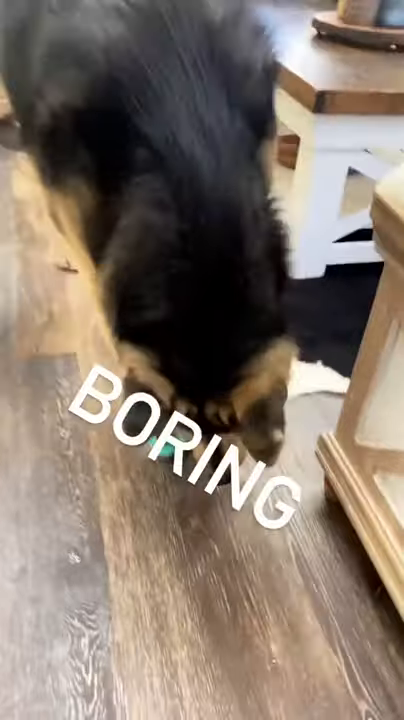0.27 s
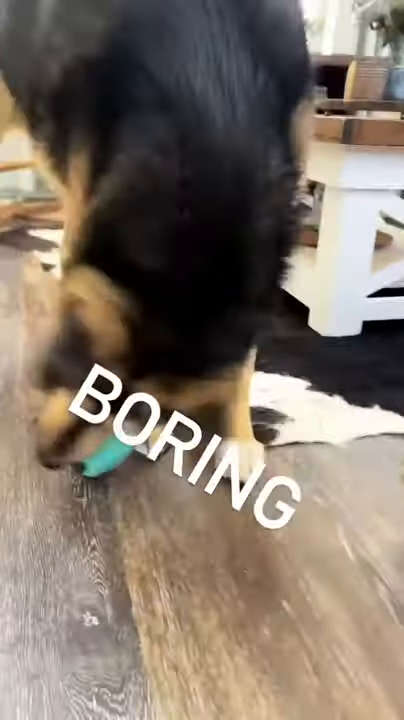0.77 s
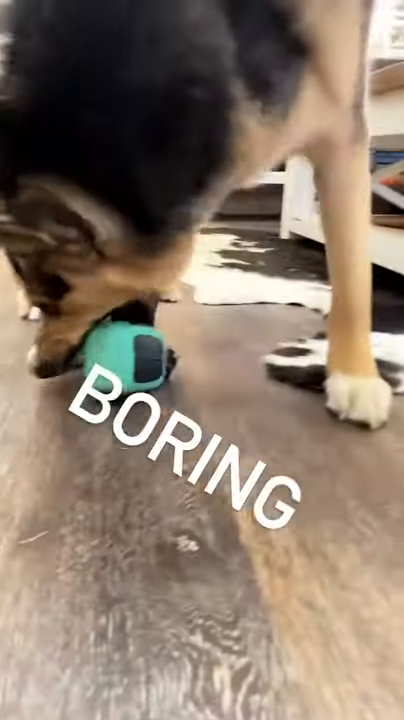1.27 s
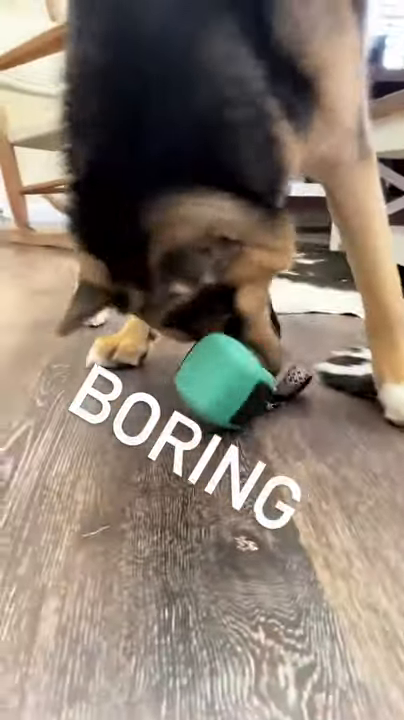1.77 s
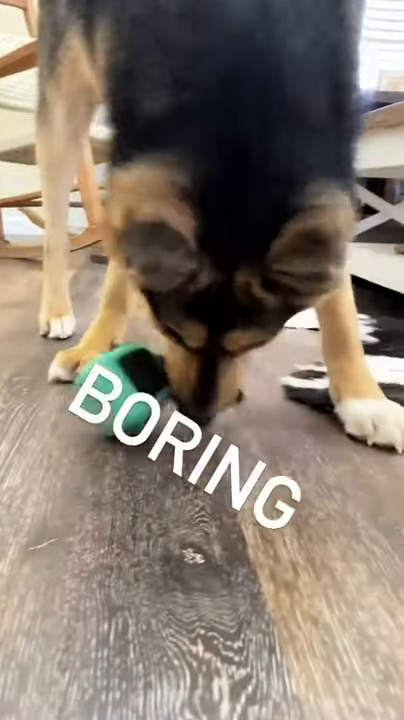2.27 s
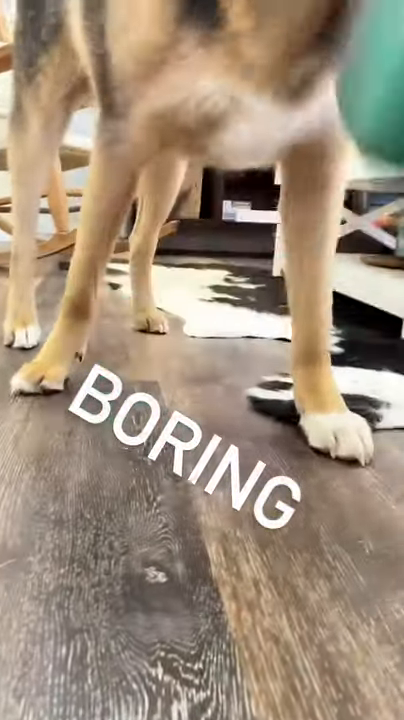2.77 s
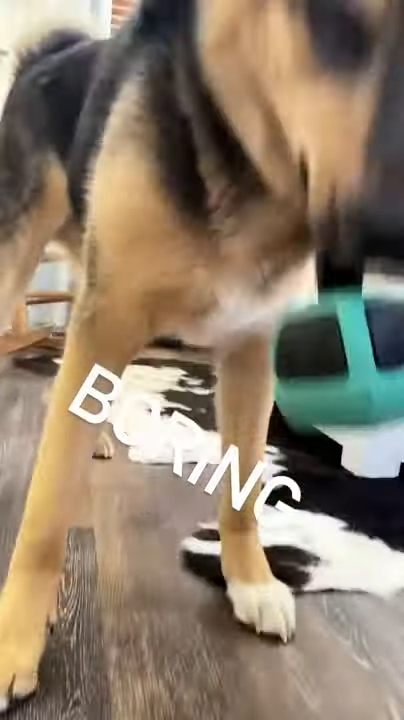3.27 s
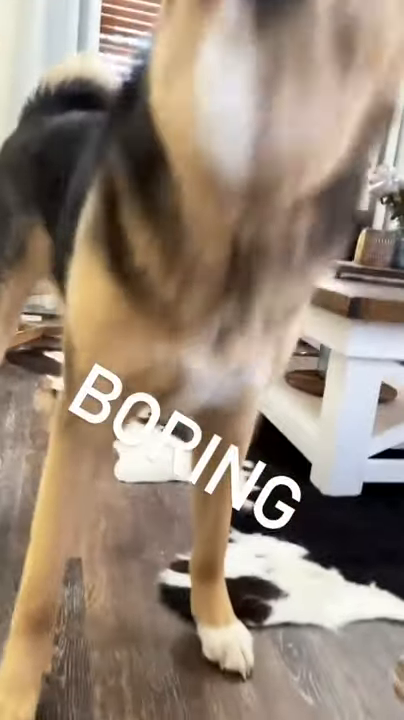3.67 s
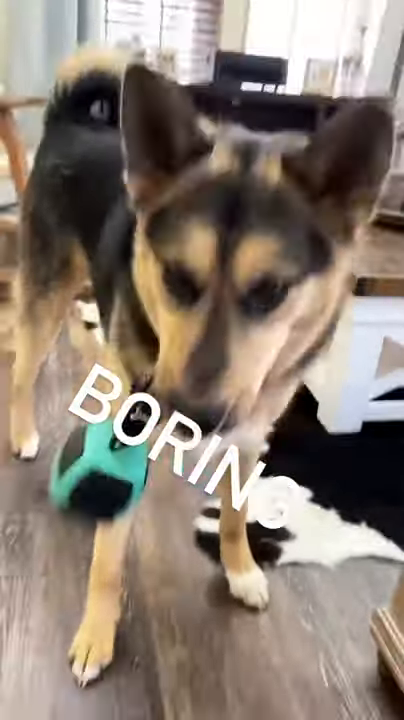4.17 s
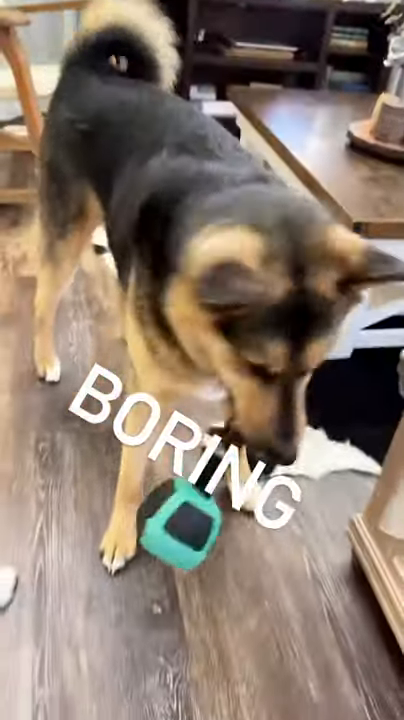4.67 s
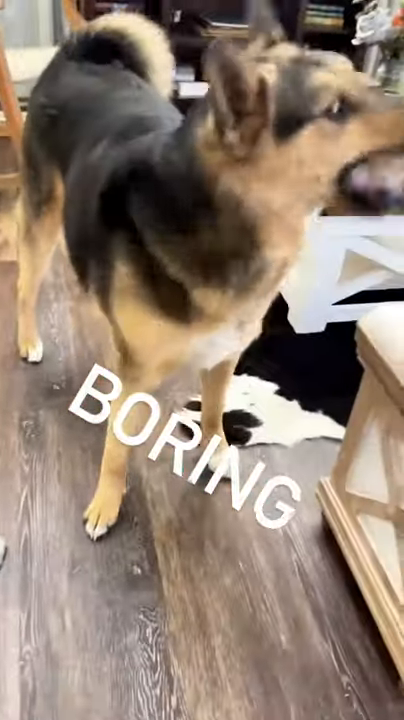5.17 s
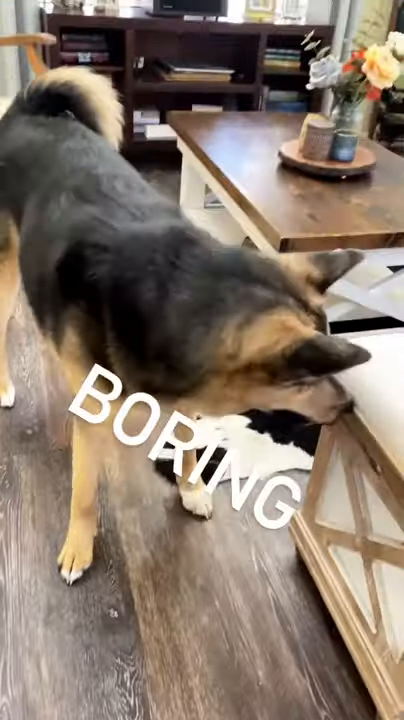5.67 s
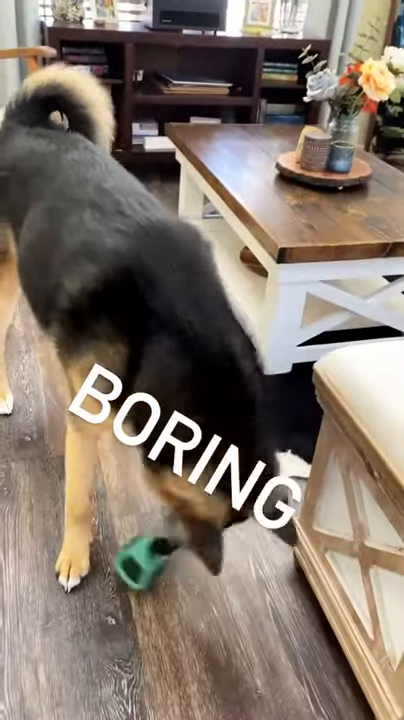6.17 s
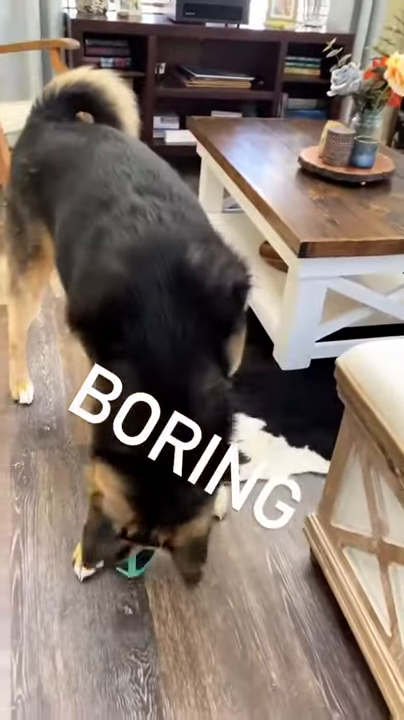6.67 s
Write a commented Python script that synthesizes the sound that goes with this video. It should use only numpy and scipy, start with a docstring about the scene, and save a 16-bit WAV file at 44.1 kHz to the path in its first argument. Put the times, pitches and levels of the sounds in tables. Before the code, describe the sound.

In a living room with a wooden floor, a low, slightly wavering hum runs throughout beneath soft rumble. Close to a stereo phone, a large dog snuffles at a rubber ball on a strap. From 0 to 0.9 s there are faint hollow breaths, rustling fur, dull paw bumps, clicks and a short scuff near 0.3 s. Around 1.0 s comes a busy moment: a strong wet sniff, bright teeth clicks, paw thumps and a low puff of air. After a quieter gap, sniffs and clicks return at 2.0-2.2 s, then short huffs, soft squeaky rubber scuffs, a sharp click near 3.0 s and padding until 3.6 s. Light clicks and faint breath follow around 4.1 s. At 5.28 s the ball lands with a loud double slap and woody boom, bounces at 5.47 and 5.59 s, thuds again at 6.06 s and tumbles softly until 6.24 s, leaving hum and tiny rubber scuffs until about 7 s.

```python
"""Over a low hum in a living room with a wooden floor, a large dog snuffles at a rubber ball on a strap, close to a phone.
Paws pad, teeth and lips click, rubber scuffs, fur and strap rustle; a puff of air buffets the microphones at 1 s.
From 5.3 s the swung ball thumps down, bounces and settles; the boards boom and the room rings.
Noise through resonances makes breath, fur and contacts; decaying sines make the boards."""
import sys
import numpy as np
from scipy import signal
from scipy.fft import rfft, irfft
from scipy.io import wavfile
from scipy.ndimage import map_coordinates

SR = 44100
rng = np.random.default_rng(int(sys.argv[2]) if len(sys.argv) > 2 else 0)


def pcm_store(signal):
    """Save signal as 16-bit PCM."""
    levels = np.round(np.clip(np.atleast_2d(signal), -1, 1) * 32767)
    wavfile.write(sys.argv[1], SR, levels.astype(np.int16).T)


N = 304849
TIME = np.arange(N) / SR


def undb(db):
    """Decibels to gain."""
    return 10 ** (np.asarray(db) / 20)


def unit(x):
    """Scale to rms 1."""
    return x / np.sqrt(np.mean(x ** 2))


def freqs(size):
    """Bin frequencies in Hz, kept at 1 or above."""
    return np.maximum(np.arange(size // 2 + 1) * SR / size, 1)


def lookup(points, hz):
    """Read (Hz, value) points on a log-frequency axis."""
    point_hz, value = np.transpose(points)
    return np.interp(np.log(hz), np.log(point_hz), value)


def colour(x, gain):
    """Filter by a gain per bin."""
    return irfft(rfft(x) * gain, x.shape[-1])


def causal(gain):
    """Minimum-phase impulse response with this gain per bin, by folding the cepstrum."""
    cepstrum = irfft(np.log(gain + 1e-6))
    half = len(cepstrum) // 2
    cepstrum[1:half] *= 2
    cepstrum[half + 1:] = 0
    return irfft(np.exp(rfft(cepstrum)))


def bump(f, hz, octaves):
    """Broad resonance with steep skirts: about -6 dB at the given octaves either side."""
    return (1 + (np.log2(f / hz) / octaves) ** 2 / 4) ** -3


def sweep(x, centre_hz, octaves):
    """Pass x through a broad resonance whose centre moves."""
    f, t, frames = signal.stft(x, SR, nperseg=256)
    centre = np.interp(t, TIME[:len(x)], centre_hz)
    gain = bump(np.maximum(f, 1)[:, None], centre, octaves)
    return signal.istft(frames * gain, SR)[1][:len(x)]


def swell(age_s, length_s, rise):
    """Distance from a gesture's peak, in rise times before it and fall times after it."""
    rise = np.clip(rise, .1, .9)
    return np.abs(age_s) / (length_s * np.where(age_s < 0, rise, 1 - rise))


def add(track, s, x):
    """Mix x into the track at time s."""
    i = max(int(s * SR), 0)
    track[i:i + len(x)] += x[:max(N - i, 0)]


def burst(gain, ms, grain_db, snap):
    """Contact: one snap and a quick train of tiny slips through a resonance; rms 1 over ms."""
    size = 2 * (len(gain) - 1)
    age = np.arange(size) / SR / (ms / 1000)
    grip = np.sqrt(age) * np.exp(-np.minimum(age, 10) ** 2 * 2)
    grain = undb(grain_db * rng.standard_normal(size))
    slips = rng.standard_normal(size) * grain * grip
    slips /= np.sqrt(np.sum(slips ** 2))
    slips[int(ms / 1000 * SR) // 10] += snap
    x = signal.fftconvolve(slips, causal(gain))[:size]
    return x * np.sqrt(ms / 1000 * SR / np.sum(x ** 2))


def diffuse(x):
    """Two unrelated signals become sound from all around: alike in the bass, apart in the treble."""
    likeness = .98 / (1 + (freqs(x.shape[-1]) / 540) ** 3)
    mid = colour(x[0], np.sqrt((1 + likeness) / 2))
    side = colour(x[1], np.sqrt((1 - likeness) / 2))
    return np.array([mid + side, mid - side])


# spectrum of the house's rumble: f/Hz, relative level/dB
RUMBLE_SPECTRUM = [(25, -8), (66, -2), (97, -5), (160, -3), (220, -14), (330, -20), (500, -31), (900, -41),
                   (2000, -51), (6000, -66), (13000, -68)]
RUMBLE_DB, HUM_DB, HUM_HZ = -48.5, -42.5, 49.3
HUM_WAVER_DB, HUM_WAVER_HZ = 3.2, 8.9  # rms depth, centre rate


def ambience():
    """House rumble is diffuse shaped noise; an appliance hum is a sine of wavering level."""
    noise = rng.standard_normal((2, N))
    rumble = unit(diffuse(colour(noise, undb(lookup(RUMBLE_SPECTRUM, freqs(N))))))
    waver = unit(colour(rng.standard_normal(N), bump(freqs(N), HUM_WAVER_HZ, octaves=1)))
    hum = unit(np.sin(2 * np.pi * HUM_HZ * TIME) * undb(HUM_WAVER_DB * waver))
    return undb(RUMBLE_DB) * rumble + undb(HUM_DB) * hum


# reverberation time of the room: f/Hz, t60/s
ROOM_DECAY = [(60, 1), (160, 0.44), (420, 0.84), (1100, 0.77), (3000, 0.71), (7000, 0.32), (13000, 0.043)]


def room(x):
    """Reflections build within a few milliseconds and decay at a rate set per octave band."""
    t, f = TIME[:SR], freqs(size=SR)
    noise, tail = rng.standard_normal((2, SR)), 0
    for hz in 2. ** np.arange(5, 15):
        band = np.maximum(1 - np.abs(np.log2(f / hz)), 0)
        decay = np.exp(-np.log(1000) * t / lookup(ROOM_DECAY, hz))
        tail = tail + colour(noise, band) * decay
    tail = diffuse(tail) * (1 - np.exp(-(t / 0.00073) ** 2))
    tail = tail / np.sqrt(np.sum(tail ** 2) / 2)
    return signal.fftconvolve(x[None], tail, axes=1)[:, :N]


def draught(s=1.0, length_s=0.0623, db=-40, hz=118):
    """As the dog brushes past, a puff of air buffets each microphone port with its own noise."""
    eddies = unit(colour(rng.standard_normal((2, N)), bump(freqs(N), hz, octaves=0.15)))
    return undb(db) * eddies * np.exp(-((TIME - s) / length_s) ** 2)


# fur and strap slide as the dog shifts: peak t/s, level/dB, length/s
SLIDES = [(0, -64, 0.18), (0.42, -58, 0.38), (0.905, -45, 0.078), (1.15, -61, 0.22), (1.507, -68, 0.13),
          (1.846, -67, 0.054), (2.02, -65, 0.06), (2.568, -56, 0.035), (3.037, -58.5, 0.15),
          (3.49, -65, 0.26), (3.963, -70, 0.18), (4.56, -69, 0.25), (5.11, -70, 0.14), (5.451, -68.5, 0.1),
          (6.17, -76, .08)]
SLIDE_RISE = .4  # share of length


def sliding():
    """Strength of fur and strap sliding: each rub swells and dies away."""
    return sum(undb(db) * np.exp(-swell(TIME - s, length_s, SLIDE_RISE)) for s, db, length_s in SLIDES)


# spectrum of rubbing hair and webbing: f/Hz, relative level/dB
FUR_SPECTRUM = [(1500, -5.5), (4000, -1.5), (6300, -6), (8000, 3), (10000, 1.5), (13000, 1)]


def fur():
    """Dense tiny grains of hair and webbing rubbing: noise of jumping level, shaped by the sliding."""
    grain_db = 0.72 * np.repeat(rng.standard_normal(N // 64 + 1), 64)[:N]
    grains = rng.standard_normal(N) * undb(grain_db)
    return unit(colour(grains, undb(lookup(FUR_SPECTRUM, freqs(N))))) * sliding()


CLICK_MS = 5.4
TICKS_PER_S, TICK_DB, TICK_SPREAD_DB = 16, -5, -7  # levels against the sliding
TICK_HZ, TICK_SPREAD_OCTAVES, TICK_OCTAVES = 3440, 0.79, .7


def strap(count=200):
    """While it slides the strap catches at random with faint ticks."""
    out, f = np.zeros(N), freqs(size=2048)
    times = np.cumsum(rng.exponential(size=count)) / TICKS_PER_S
    for s, (loud, bright) in zip(times, rng.standard_normal((count, 2))):
        ring = bump(f, TICK_HZ * 2 ** (TICK_SPREAD_OCTAVES * bright), TICK_OCTAVES)
        tick = burst(ring, CLICK_MS, grain_db=4, snap=.35)
        add(out, s, undb(TICK_DB + TICK_SPREAD_DB * loud) * tick)
    return out * sliding()


# modes of the floorboards: f/Hz, relative level/dB, t60/s
BOARD_MODES = [(53.3, -10, 0.33), (64, -11, 0.41), (81.5, -7, 0.52), (95.6, -2, 0.37), (112.4, 3, 0.22),
               (160, 1.5, 0.26), (225.7, 2.5, 0.21), (248, -0.5, 0.11), (321.5, -3.5, 0.21),
               (392.2, 1, 0.18), (439, -13, 0.11), (522, -10, 0.17), (623, 0, 0.16), (776, -13, .14)]


def boards(corner_hz, build_s):
    """Floor modes ring as decaying sines after one blow; a soft contact weakens the high ones."""
    hz, db, t60_s = np.transpose(BOARD_MODES)[:, :, None]
    t = TIME[:SR]
    hz = hz * (1 + 0.0033 * rng.standard_normal(hz.shape))
    gain = undb(db) / np.sqrt(1 + (hz / corner_hz) ** 4)
    sign = rng.choice([-1, 1], hz.shape)  # swing direction depends on the spot hit
    decay = np.exp(-np.log(1000) * t / t60_s)
    ring = np.sum(sign * gain * np.sin(2 * np.pi * hz * t) * decay, axis=0)
    return ring * (1 - np.exp(-t / build_s)) / np.sqrt(np.sum(gain ** 2))


# paws and nudges of the ball on the floor: t/s, level/dB
PAW_PADS = [(0.302, -30.5), (0.551, -37.5), (0.645, -29), (0.689, -44.5), (0.959, -31), (1.061, -38.5),
            (1.121, -33.5), (1.346, -35), (1.958, -41), (2.201, -41), (2.973, -31.5), (3.39, -32.5),
            (3.634, -36), (6.429, -51.5)]
PAD_CORNER_HZ = 125


def paws():
    """Soft, slow pushes ring the low floor modes."""
    out = np.zeros(N)
    for s, db in PAW_PADS:
        add(out, s, undb(db) * boards(PAD_CORNER_HZ, build_s=0.0036))
    return out


# nudged rubber scuffs: t/s, level/dB, centre f/Hz, length/ms, half-width/octaves
RUBBER_SCUFFS = [(0.272, -67, 640, 19, 0.52), (0.352, -62.5, 2000, 41, 1.1), (1.314, -70.5, 2050, 42, 0.69),
                 (2.39, -72.5, 1994, 66, 0.24), (2.731, -63, 1180, 117, 0.38), (3.22, -66, 1910, 75, 0.14),
                 (4.17, -73.5, 1310, 127, 0.4), (4.26, -78, 2720, 36, 0.16), (4.314, -64, 1490, 26, 0.089),
                 (6.59, -75.5, 1700, 66, 0.16), (6.852, -74, 1680, 110, 0.22)]
SCUFF_GLIDE_PER_S = 1.0  # pitch rise as a share of the pitch


def scuffs():
    """Rubber sticks and slips in a gritty, half-pitched squeak that rises as it stretches."""
    out, f = np.zeros(N), freqs(size=8192)
    for s, db, hz, ms, octaves in RUBBER_SCUFFS:
        slips = burst(bump(f, hz, octaves), ms, grain_db=7.5, snap=0)
        t = TIME[:len(slips)]
        read_s = t * (1 + SCUFF_GLIDE_PER_S * t / 2)
        add(out, s, undb(db) * np.interp(read_s, t, slips))
    return out


# teeth, lips and strap click on the toy: t/s, level/dB, centre f/Hz, half-width/octaves
MOUTH_CLICKS = [(0.268, -43.5, 470, 0.5), (0.3162, -36.5, 960, 0.96), (0.3406, -39.5, 4750, 11),
                (0.64, -46, 497, 0.68), (1.0214, -42.5, 3240, 0.66), (1.045, -36, 4360, 1.1),
                (1.050, -31.5, 3880, 2.8), (1.0559, -33, 6410, 0.39), (1.061, -47, 5570, 1.7),
                (1.289, -49.5, 499, 0.46), (1.316, -62, 1636, 0.74), (1.343, -65, 1615, 0.7),
                (1.545, -80, 2260, 0.18), (1.612, -74, 1485, 0.55), (1.628, -68, 613, 0.42),
                (1.992, -65, 960, 0.28), (2.022, -68.5, 2120, 0.26), (2.178, -41.5, 926, 0.45),
                (2.2, -43.5, 1030, 0.68), (2.454, -62, 9100, 0.25), (2.456, -56, 1960, 0.36),
                (2.561, -47, 11300, 0.45), (2.565, -53, 477, 0.32), (2.625, -58, 9000, 2),
                (2.816, -46.5, 6700, 1.05), (2.979, -50.5, 1270, 0.84), (2.979, -36.5, 8400, 0.89),
                (3.366, -55, 2120, 0.37), (3.385, -45, 636, 0.99), (3.412, -40, 840, 0.59),
                (3.635, -43, 349, 0.22), (4.032, -55, 6630, 0.38), (4.079, -57, 1096, 0.42),
                (4.14, -51, 870, 0.47), (5.145, -62.5, 980, 0.3), (5.231, -50, 770, 0.65)]


def mouth():
    """Teeth skid on the strap with bright clicks; lips and jaw make duller, hollow ones."""
    out, f = np.zeros(N), freqs(size=4096)
    for s, db, hz, octaves in MOUTH_CLICKS:
        click = burst(bump(f, hz, octaves), CLICK_MS, grain_db=4, snap=.35)
        add(out, s, undb(db) * click)
    return out


HEAD_SWAY_MS, HEAD_SWAY_HZ = .35, .8


def floor_echo(x, share):
    """Floor and dog's body return two copies milliseconds later; head motion varies the delays."""
    t, out = TIME[:len(x)], x
    delays_s = rng.uniform([.001, .005], [.003, .009])
    for delay_s, turn in zip(delays_s, rng.random(2)):
        late_s = delay_s + HEAD_SWAY_MS / 1000 * np.sin(2 * np.pi * (HEAD_SWAY_HZ * t + turn))
        out = out + share * map_coordinates(x, [(t - late_s) * SR], order=3)
    return out / np.sqrt(1 + 2 * share ** 2)


# snuffles: peak t/s, length/s, hollow level/dB, hiss level/dB, hiss centre f/Hz,
# hiss half-width/octaves, hiss glide/(octaves/s)
SNUFFLES = [(-0.019, 0.27, -60, -93, 2920, 0.56, -9), (0.413, 0.31, -59, -86, 3700, .83, -3),
            (0.785, 0.45, -64, -64.5, 2950, 0.89, 0), (0.933, 0.065, -54, -81, 3900, .83, 0),
            (1.063, 0.052, -47.5, -49.5, 3000, 0.44, -8), (2.137, 0.076, -53, -68, 4800, 1, -4),
            (2.202, 0.15, -50.5, -68.5, 2860, 0.7, -2.5), (2.443, 0.075, -63.5, -85, 2080, 0.59, -1),
            (2.773, 0.037, -54.5, -66.5, 2400, 0.56, 6.5), (2.816, 0.063, -49.5, -67.5, 2740, 0.41, -2),
            (2.981, 0.082, -56.5, -70.5, 2150, 0.67, 7), (3.245, 0.15, -57, -61.5, 1980, 0.67, 1),
            (3.56, 0.61, -67.5, -63.5, 2850, 0.79, -0.4), (3.786, 0.13, -75, -71.5, 3820, 0.11, .6),
            (4.282, 0.25, -63, -75.5, 2300, 1, 1)]
# resonances of the muzzle: f/Hz, width/Hz, relative level/dB
MUZZLE_MODES = [(420, 45, 17), (637, 39, 6), (762, 36, 9.5), (1094, 47, 6), (1312, 95, 2),
                (1140, 529, -3.5), (1875, 660, -6.5), (2150, 550, -5)]
MUZZLE_SPREAD = 0.032  # random share by which a snuffle moves the modes
SNUFF_RISE = 0.51  # share of length


def muzzle(f):
    """Gain of the muzzle's resonances, shifted together at random, summed as powers."""
    shape = 1 + MUZZLE_SPREAD * rng.standard_normal()
    power = 0
    for hz, width_hz, db in MUZZLE_MODES:
        power = power + undb(2 * db) / (1 + (2 * (f - shape * hz) / width_hz) ** 2) ** 0.89
    return np.sqrt(power)


def nose(flutter_db=2.5, wet_db=4, hiss_wet_db=1.5, surge_db=1.0, surge_hz=20):
    """Turbulent air excites the muzzle and hisses at moist nostrils: it surges, flutters, crackles, glides."""
    out, f = np.zeros(N), freqs(size=2 * SR)
    t = np.arange(2 * SR) / SR
    roll_off = 1 / np.sqrt(1 + (f / 7000) ** 20)
    for s, length_s, hollow_db, hiss_db, hiss_hz, octaves, glide in SNUFFLES:
        start_s = max(s - 1, 0)
        age_s = start_s + t - s
        noise = rng.standard_normal((5, len(t)))
        crackle = np.repeat(noise[3, ::100], 100)
        flutter = undb(flutter_db * unit(colour(noise[2], 1 / (1 + (f / 60) ** 2))))
        surge = undb(surge_db * unit(colour(noise[4], bump(f, surge_hz, octaves=1.0))))
        flow = np.exp(-swell(age_s, length_s, SNUFF_RISE) ** 2) * surge
        breath = colour(noise[0] * undb(wet_db * crackle), muzzle(f))
        hollow = undb(hollow_db) * unit(flutter * breath)
        centre_hz = hiss_hz * 2 ** (glide * np.clip(age_s, -length_s, length_s))
        spray = sweep(noise[1] * undb(hiss_wet_db * crackle), centre_hz, octaves)
        hiss = undb(hiss_db) * unit(colour(spray, roll_off))
        add(out, start_s, floor_echo(flow * (hollow + hiss), share=0.78))
    return out


# ball landings: t/s, board boom level/dB, contact corner f/Hz, rubber slap level/dB,
# slap corner f/Hz, board swing-back level/dB
LANDINGS = [(5.280, -26.5, 720, -27, 3320, -38), (5.288, -23, 340, -23, 380, -16),
            (5.466, -33, 325, -50.5, 590, -53), (5.586, -25, 393, -33.5, 2040, -17),
            (6.060, -25.5, 165.5, -36.5, 906, -20), (6.14, -32, 75, -42.5, 940, -32.5),
            (6.181, -29.5, 65, -46.5, 1210, -35), (6.235, -36, 60, -61.5, 380, -37)]
# spectrum of the hollow ball's slap: f/Hz, relative level/dB
SLAP_SPECTRUM = [(80, -21), (250, 10), (380, 2.5), (490, -0.5), (620, -1.5), (850, -7), (1100, -9),
                 (1500, -13.5), (2400, -19), (4200, -22), (7000, -32), (13000, -18.5)]
REBOUND_S, REBOUND_MAX_HZ = 0.022, 125  # delay, highest corner


def ball(rattle_db=-16):
    """Landings slap the rubber and boom the boards, which swing back; a chatter favours hard slaps."""
    out, f = np.zeros(N), freqs(size=8192)
    hardest_db = max(row[3] for row in LANDINGS)
    for s, boom_db, contact_hz, slap_db, slap_hz, swing_db in LANDINGS:
        boom = boards(contact_hz, build_s=0.0018)
        add(out, s, undb(boom_db) * boom)
        swing = boards(min(contact_hz, REBOUND_MAX_HZ), build_s=0.012)
        add(out, s + REBOUND_S, undb(swing_db) * swing)
        shell = undb(lookup(SLAP_SPECTRUM, f)) / np.sqrt(1 + (f / slap_hz) ** 4)
        slap = burst(shell, ms=7.1, grain_db=10.5, snap=0.58)
        add(out, s, undb(slap_db) * slap)
        chatter_db = slap_db + rattle_db + 0.047 * (slap_db - hardest_db)
        chatter = burst(shell, ms=57, grain_db=-2.5, snap=0)
        add(out, s, undb(chatter_db) * chatter)
    return out


PORT_LEAD_RAD, PORT_TURN_HZ = 2.714, 4470  # left's lead: upper limit, frequency of half the limit


def ports(x):
    """Direct sound leads at the left port; in the treble the two swing against each other."""
    turn = np.exp(.5j * PORT_LEAD_RAD / (1 + (PORT_TURN_HZ / freqs(N)) ** 3))
    return np.array([colour(x, turn), colour(x, turn.conj())])


def scene():
    """The muzzle is near the phone; the floor is further off and wetter."""
    floor = ball() + paws()
    clicks = mouth() + strap() + scuffs()
    air = nose() + fur()
    wet = room(undb(-10.5) * floor + undb(-12.0) * clicks + undb(-14.0) * air)
    return ports(floor + clicks + air) + wet + draught() + ambience()


# response of the phone's microphones: f/Hz, level/dB
MIC_RESPONSE = [(30, -15.5), (50, -8), (3000, 7.5), (5000, 10.5), (6400, 10), (7300, 4.5), (8200, 0),
                (11000, -6), (12800, -4.5)]
# stereo widening, gain of the side signal: f/Hz, level/dB
SIDE_GAIN = [(200, -8.5), (400, 2.5), (700, 4), (1150, 1.5), (1700, -5), (2400, 4.5), (3100, 2), (4000, -1),
             (7000, 0.5), (10000, -0.5)]
TOP_HZ = 13500


def record(dry):
    """Microphones colour the sound, the phone alters stereo width by band, and a low-pass cuts the top."""
    f = freqs(N)
    fade = np.minimum(np.minimum(TIME, TIME[::-1]) / .005, 1)
    left, right = colour(dry * fade, undb(lookup(MIC_RESPONSE, f)))
    mid = (left + right) / 2
    side = colour((left - right) / 2, undb(lookup(SIDE_GAIN, f)))
    low_pass = signal.ellip(8, .2, 70, TOP_HZ, fs=SR, output="sos")
    return signal.sosfilt(low_pass, [mid + side, mid - side])


dry = scene()
out = record(dry)
pcm_store(out)
```